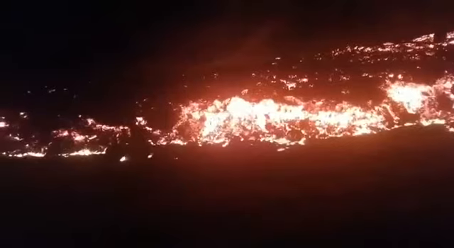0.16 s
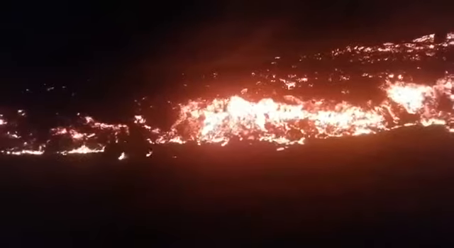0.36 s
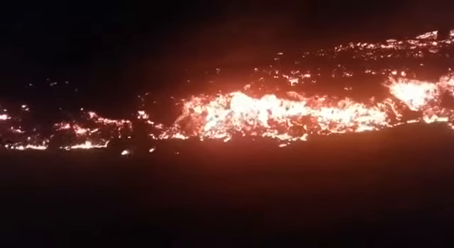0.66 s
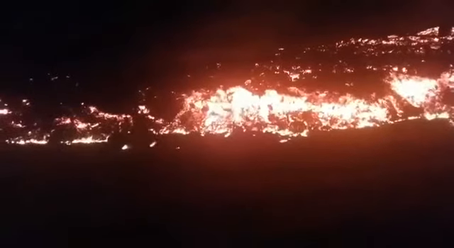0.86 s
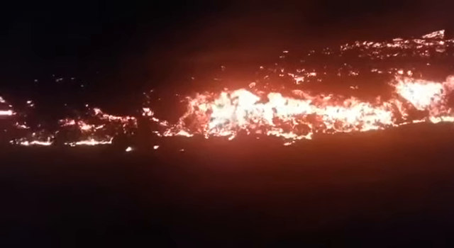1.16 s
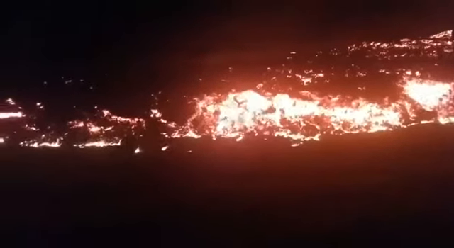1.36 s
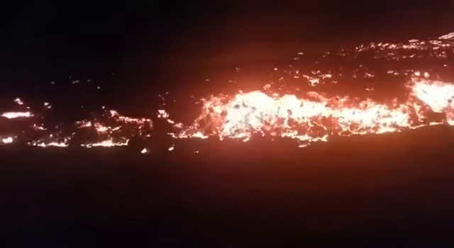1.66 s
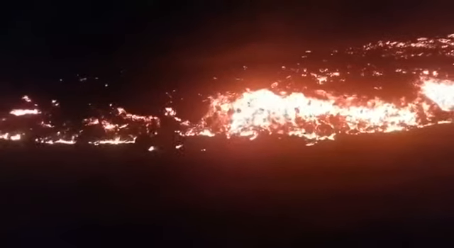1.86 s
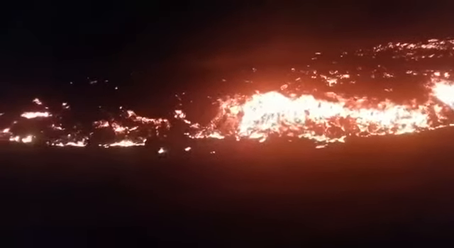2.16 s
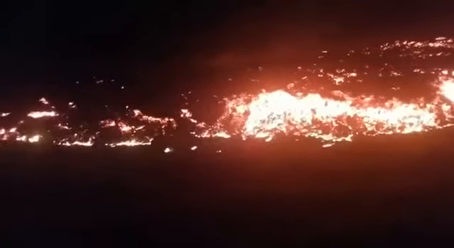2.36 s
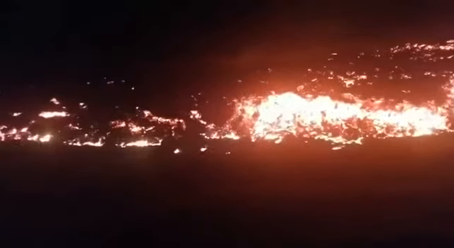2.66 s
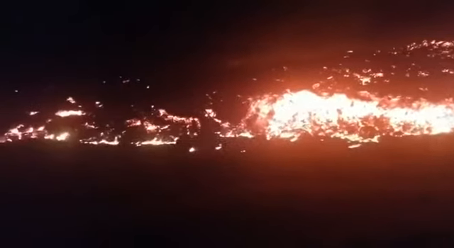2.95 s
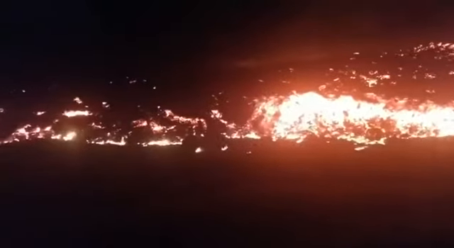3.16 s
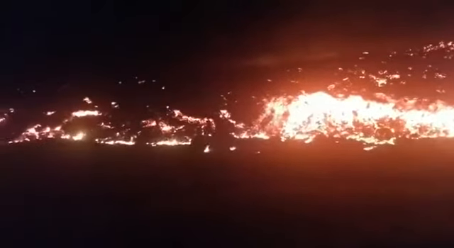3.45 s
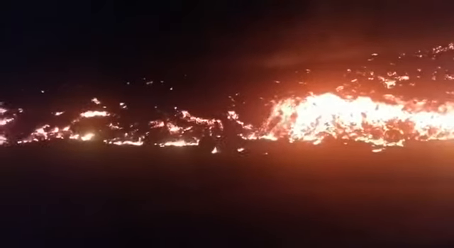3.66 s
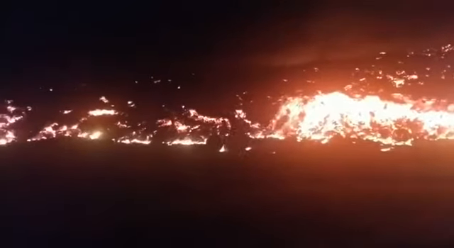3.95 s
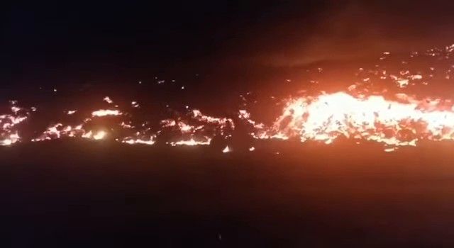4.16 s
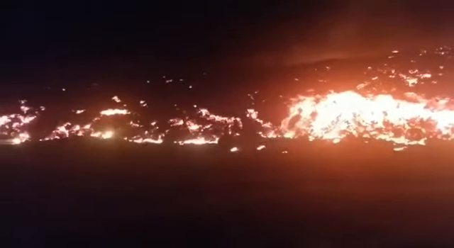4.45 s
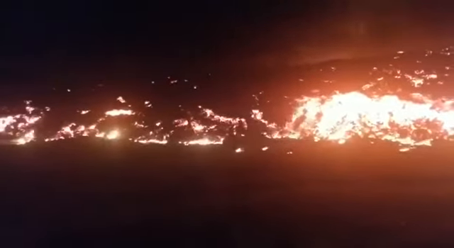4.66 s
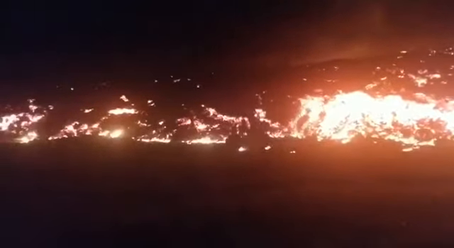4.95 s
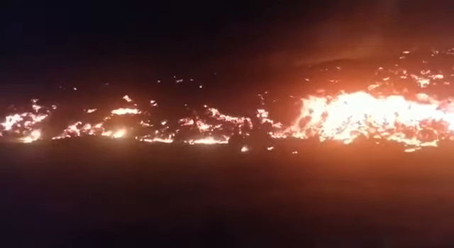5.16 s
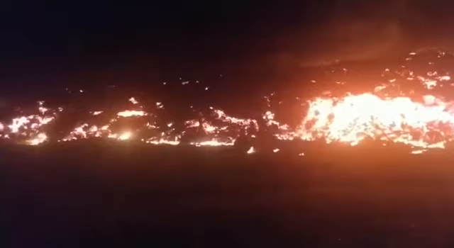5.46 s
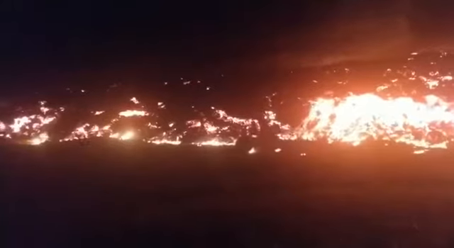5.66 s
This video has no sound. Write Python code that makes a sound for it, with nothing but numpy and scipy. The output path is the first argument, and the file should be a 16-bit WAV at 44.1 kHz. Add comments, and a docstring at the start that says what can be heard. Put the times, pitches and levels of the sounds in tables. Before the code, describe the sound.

A steady, bright hiss of gas and fine grit runs throughout, mixed with coarser, brittle crackling and wavering slightly as small slides come and go. Faint low wind lies beneath. The first 0.7 s holds mostly hiss, soft rustling and a couple of snaps. From about 0.8 s loose pieces clink, knock and click, with small dull slumps recurring until 2.8 s. Thin, breathy whistles appear faintly near 1.1, 1.4 and 1.5 s. Breakage is busiest from 1.5 to 2.7 s, with prominent glassy ticks at 1.5 s and crunchy snaps around 1.8-1.95, 2.35 and 2.65 s. It thins around 3 s; two high whistles sink near 3.6 s. A compact knock-and-clink cluster comes at 4.18 s, a strong short clink at 4.82 s, and a rattling cluster at 5.07 s. A last faint whistle passes near 5.6 s while hissing continues. Outdoor, close, mono, very short echo.

```python
"""A front of clinkery lava creeps forward at night, heard outdoors through one small microphone.
From the start, shaped noise and tiny damped sines hiss and crackle over a low noise rumble of light wind.
Soon the crust snaps in noise bursts, rustles in swelling noise and, until about halfway, slumps dully.
Loose pieces then clink as short sine rings and knock as single pushes; plates click in very short noise.
About a second in comes the first of a few thin, breathy whistles."""
import sys
import numpy as np
from scipy import signal
from scipy.fft import rfft, irfft, next_fast_len
from scipy.io import wavfile
from scipy.ndimage import uniform_filter1d, map_coordinates

SR = 44100
rng = np.random.default_rng(int(sys.argv[2]) if len(sys.argv) > 2 else 0)


def transcribe(u):
    """Save the signal u as a 16-bit wav file named by the first command-line argument.

    u: samples, shape (n,) or (channels, n), limited to [-1, 1]; the rate is SR.
    q: integer samples, one column per channel.
    """
    v = np.clip(np.atleast_2d(u).T, -1, 1)
    q = np.round(v * 32767).astype(np.int16)
    wavfile.write(sys.argv[1], SR, q)


N = 255780

# how busily the front crumbles: (time [s], activity [dB])
ACTIVITY = [(0, -0.4), (.55, 0), (.73, -2), (.78, 0), (.92, -0.5), (1.12, 0), (1.2, -2.5), (1.26, -2.8),
            (1.31, 1), (1.92, 1), (2.25, -0.4), (2.5, -0.9), (2.95, -1.5), (3.03, -0.9), (3.4, -1),
            (3.55, 0.5), (3.88, 1.36), (3.94, -1), (4.08, -1.5), (4.22, 1.1), (4.62, 1), (4.69, -0.4),
            (4.76, 0.3), (4.9, 1.5), (4.99, -0.7), (5.1, 1), (5.27, -0.7), (5.45, 0.2), (5.8, 0)]
# spectrum of gas and fine grit: (frequency [Hz], relative level [dB])
HISS_SPECTRUM = [(150, -11.5), (400, -10), (1000, -4.5), (2500, -3), (4500, -3.5), (5100, -0.5),
                 (6600, -0.5), (7400, 1.5), (8000, 0.7), (8300, -0.35), (9000, 1), (10600, -0.7),
                 (11200, -7)]
# spectrum of the crumbling crust: (frequency [Hz], relative level [dB])
CRUST_SPECTRUM = [(200, -42.5), (450, -3.5), (700, -7.5), (900, 2), (1150, -8), (1400, -7), (2000, -2.5),
                  (3000, -7.5), (4200, -2.5), (6500, -3), (11000, -8.5)]
# resonant hollows in the rubble: (centre [Hz], width [Hz], lift at unit depth [dB])
HOLLOW_MODES = [(923, 53, -2), (1342, 52, 7), (1690, 79, 4), (2070, 26, 2), (2610, 99, 2), (3024, 260, 2.5),
                (3750, 46, 4.5)]
# spectrum of wind at the microphone: (frequency [Hz], relative level [dB])
WIND_SPECTRUM = [(20, -56), (35, -43), (48, -20), (62, 0.5), (95, 0), (130, -4), (200, -12.5), (350, -23),
                 (900, -20), (3000, -39.5)]
# gusts: (middle [s], length [s], relative level [dB])
WIND_GUSTS = [(.5, 0.16, -49), (1.34, 0.067, -52), (2.95, 0.11, -42), (3.03, 0.051, -42),
              (3.4, 0.75, -51.5), (3.635, .075, -40), (3.98, .06, -47), (5.15, 0.34, -58)]
# the crust snaps and sheds grit: (time [s], relative crunch level [dB], brightness [dB], t60 [s])
CRUST_SNAPS = [(.156, -33, 12.5, .04), (.307, -25.5, 2, 0.059), (0.811, -28, 10, .034),
               (0.855, -28.5, 4.5, 0.078), (.998, -31, -4, .04), (1.018, -28.5, 0, 0.056),
               (1.162, -29.5, 7.5, 0.044), (1.284, -29, 5.5, 0.095), (1.504, -30, -6, .025),
               (1.512, -28.5, 1, .08), (1.54, -29, 3, .04), (1.586, -26.5, 2.5, 0.073),
               (1.62, -32, 9.5, 0.126), (1.738, -35, 10.5, 0.11), (1.794, -22.5, -1, .06),
               (1.805, -27, 7, .08), (1.826, -28.5, 7.5, .075), (1.908, -26.5, 1, .06),
               (1.946, -22, 1.5, 0.051), (1.979, -28, 6, .035), (2.158, -29.5, 7.5, 0.046),
               (2.302, -27.5, -2, 0.055), (2.338, -28, 5.5, 0.19), (2.366, -23, 2.5, 0.119),
               (2.64, -22, 2.5, 0.032), (2.855, -30, -4.5, 0.045), (3.009, -36, 6, .04),
               (3.298, -27, 4, 0.077), (3.727, -33, 9, 0.1), (3.862, -28, 4, 0.058), (3.895, -31, -4, .04),
               (4.205, -33.5, 14, .031), (4.335, -30, 9.5, 0.026), (4.743, -33, 14, .042),
               (4.853, -37, 8, .12), (5.065, -25.5, 0, 0.045), (5.112, -29, 6, .06),
               (5.311, -28, 4.5, 0.049), (5.449, -30, 3, 0.082), (5.698, -32, 10, 0.038)]
# a snap's body, crunch and spray: (low edge [Hz], high edge [Hz])
BODY_CRUNCH_SPRAY = [(950, 2100), (2100, 4000), (4900, 11500)]
# a patch of crust crumbles softly: (middle [s], length [s], level [dB])
CRUMBLING_PATCHES = [(.25, 0.13, -36), (.54, 0.086, -36), (.79, 0.062, -39), (1.11, 0.081, -39.5),
                     (1.33, .076, -38.5), (2.0, 0.413, -39.5), (2.41, .046, -35), (3.27, 0.85, -41),
                     (3.5, 0.051, -40.5), (4.26, 0.1, -37), (5.55, 0.35, -44.5)]
# loose rubble gives way: (middle [s], length [s], relative level [dB])
RUBBLE_SLUMPS = [(0.775, 0.0406, -38), (0.855, 0.07, -38.5), (1.339, 0.054, -39.5), (1.45, 0.177, -39.5),
                 (1.58, 0.013, -34), (2.103, 0.091, -39), (2.77, 0.156, -41.5)]
# dull spectrum of slumping rubble: (frequency [Hz], relative level [dB])
SLUMP_SPECTRUM = [(50, -22), (130, -1), (300, -3.5), (550, -3.5), (900, -4.5), (2000, -17)]
# larger glassy pieces ring, and near 4.18 s the hollows ring after a knock: (time [s], pitch [Hz], relative
# level [dB], t60 [s])
GLASSY_PIECES = [(0.779, 2560, -23.5, 0.059), (.998, 1150, -19, 0.04), (1.161, 5320, -15, 0.024),
                 (1.164, 1592, -24.5, 0.083), (1.282, 7630, -22, .033), (1.324, 1234, -19, 0.035),
                 (1.51, 3090, -6.5, .016), (1.514, 3720, -22, .025), (1.514, 2075, -20, 0.057),
                 (1.531, 2082, -21, 0.078), (1.569, 2620, -12.5, 0.025), (1.803, 3190, -24, .03),
                 (1.827, 1397, -14.5, 0.0415), (1.833, 3280, -20, .03), (1.909, 1790, -16, .03),
                 (1.933, 2450, -16, .033), (1.946, 1731, -19, .03), (1.946, 3790, -17, .03),
                 (1.98, 2850, -17, 0.031), (2.302, 1215, -18, .05), (2.305, 6840, -10, .02),
                 (2.35, 7410, -23, .06), (2.366, 3716, -15, 0.089), (2.368, 1242, -19.5, .07),
                 (2.638, 1379, -12, 0.029), (2.64, 2950, -19, .022), (2.642, 2030, -23.5, 0.084),
                 (3.008, 3270, -23, .04), (3.041, 2930, -20, 0.033), (3.145, 1410, -12.5, 0.02),
                 (3.362, 1343, -21, .04), (3.484, 1760, -22, .045), (3.658, 3550, -16.5, 0.035),
                 (4.1762, 1710, -11, 0.025), (4.18, 890, -16, 0.024), (4.176, 530, -22, 0.025),
                 (4.24, 880, -24, .05), (4.642, 7420, -17, 0.043), (4.759, 4150, -24, .055),
                 (4.8245, 2470, 0, 0.022), (4.906, 780, -25.5, .05), (5.066, 922, -10, 0.04),
                 (5.067, 1320, -13, 0.03), (5.079, 980, -11, 0.03), (5.179, 7240, -19.5, .047),
                 (5.452, 1250, -20.5, .035), (5.457, 950, -24, 0.064), (5.466, 2230, -26, 0.087),
                 (5.573, 2730, -23, 0.062), (5.697, 2674, -23, 0.092), (5.701, 5330, -17, 0.033)]
# porous lumps land with hardly any ring: (time [s], pitch [Hz], relative level [dB])
POROUS_LUMPS = [(0.7841, 750, -20), (.833, 600, -30), (0.862, 447, -27), (1.338, 560, -24.5),
                (1.473, 350, -26.5), (1.489, 1290, -18), (1.576, 323, -23.5), (1.575, 1010, -23),
                (1.829, 700, -22.5), (1.931, 786, -26.5), (1.949, 705, -24.5), (2.033, 630, -20.5),
                (2.0349, 232, -21.5), (2.304, 910, -24), (3.466, 780, -20), (3.512, 474, -29),
                (3.997, 520, -29), (4.1772, 1020, -13), (4.178, 630, -19.5), (4.1826, 850, -20),
                (4.454, 654, -25), (4.8646, 1520, -15), (5.0682, 1370, -16), (5.072, 1200, -15),
                (5.075, 1194, -21), (5.16, 935, -23.5), (5.2423, 1005, -19)]
# thin plates of crust part: (time [s], pitch [Hz], relative level [dB])
PARTING_PLATES = [(0.855, 1700, -22), (1.0002, 2800, -18), (1.0186, 2200, -20), (1.325, 1800, -22.5),
                  (1.349, 1600, -19), (1.4889, 3000, -28), (1.5125, 3300, -19), (1.5745, 2400, -20),
                  (1.588, 3000, -24), (1.7942, 3400, -11), (1.8296, 2400, -17.5), (2.3036, 2400, -25),
                  (2.3656, 3400, -23.5), (2.393, 7400, -14), (2.6418, 3600, -13.5), (3.1301, 2300, -16.5),
                  (3.1484, 1800, -16.5), (3.6629, 4500, -23), (4.3353, 6000, -13), (4.8649, 2100, -15.5),
                  (5.2429, 1800, -21), (5.7, 4500, -21)]
# gas whistles through a crack: (middle [s], length [s], pitch [Hz], fall [octaves/s], relative level [dB])
GAS_WHISTLES = [(1.06, .16, 5970, 0.74, -41), (1.38, .16, 3930, 0, -39), (1.505, .05, 3100, 0.12, -35),
                (1.535, .035, 3870, 0.098, -34), (3.555, 0.061, 6170, .5, -33.5),
                (3.628, .075, 5190, 1.5, -33), (5.64, .15, 5990, .4, -38)]

HISS_DB, CRUST_DB = -30.5, -36.5  # levels at 0 dB activity
CRUST_GROWS = 2.06  # crackle dB per dB of activity
BREEZE_DB = -51  # between gusts, relative to the gust levels
FLAKE_CYCLES = 14  # typical cycles for a flake's ring to fall to 1/e
RISE_SHARE = .04  # time constant of a snap's rise as a share of its t60
RUB_BLUR, RUB_DB = .3, 2  # wavering of a rubbing piece: phase [radians], level [dB]
TOP_HZ = 11250  # band limit of the recorder


def amp(db):
    """Turn decibels into gain."""
    return 10 ** (np.asarray(db) / 20)


def unit(x):
    """Bring a sound to rms 1."""
    return x / np.sqrt(np.mean(x ** 2) + 1e-20)


def curves(rows):
    """Draw one value per sample for each column after the time."""
    s, *cols = np.transpose(rows)
    return [np.interp(np.arange(N) / SR, s, c) for c in cols]


def wobble(rate):
    """A smooth random curve through this many knots a second."""
    knots = rng.standard_normal(int(N * rate / SR) + 4)
    return map_coordinates(knots, [np.arange(N) * rate / SR])


def filtered(x, response):
    """Shape a sound by a gain that depends on frequency."""
    m = next_fast_len(len(x) + SR // 10)
    spectrum = rfft(x, m) * response(np.fft.rfftfreq(m, 1 / SR))
    return irfft(spectrum, m)[:len(x)]


def coloured(x, spectrum):
    """Shape a sound by (frequency [Hz], level [dB]) points, at rms 1."""
    f, db = np.transpose(spectrum)
    return unit(filtered(x, lambda hz: amp(np.interp(np.log(hz + 1), np.log(f), db))))


def band(x, low_hz, high_hz, order=4):
    """Causal band-pass."""
    edges = [low_hz, min(high_hz, SR / 2 - 1)]
    return signal.sosfilt(signal.butter(order, edges, "band", fs=SR, output="sos"), x)


def add(track, s, sound):
    """Mix a sound into the track at time s."""
    part = track[max(round(s * SR), 0):][:len(sound)]
    part += sound[:len(part)]


def swells(rows):
    """Summed gain of bell-shaped swells; each length spans the points at 1/e of the peak."""
    t = np.arange(N) / SR
    return sum(amp(db) * np.exp(-(2 * (t - s) / length) ** 2) for s, length, db in rows)


def patchy(depth_db, size=512):
    """Noise whose bands swell and fade independently."""
    z = signal.stft(rng.standard_normal(N), nperseg=size)[2]
    across_bands = uniform_filter1d(rng.standard_normal(z.shape), size=5, axis=0)
    field = uniform_filter1d(across_bands, size=7, axis=1)
    return unit(signal.istft(z * amp(depth_db * unit(field)), nperseg=size)[1][:N])


def grains(count, low_hz, high_hz, cycles, spread_db, size=700):
    """Tiny fractures at random times: damped sines, many faint and a few strong."""
    when, pitch, life, strength = rng.random((count, 4)).T[:, :, None]
    hz = low_hz + (high_hz - low_hz) * pitch
    t = np.arange(size) / SR
    gain = amp(-spread_db * np.log(np.maximum(strength, .02)))
    decay = np.exp(-t * hz / (cycles * (.5 + life)))
    waves = gain * np.sin(2 * np.pi * hz * t) * decay
    places = (when * N).astype(int) + np.arange(size)
    return unit(np.bincount(places.ravel(), waves.ravel(), N)[:N])


def hollow(x, depth=1):
    """Hollows in the rubble resonate, colouring narrow bands of the sound."""
    def response(hz):
        return amp(depth * sum(db / (1 + (2 * (hz - centre) / width) ** 2)
                               for centre, width, db in HOLLOW_MODES))
    return filtered(x, response)


def front(hiss_grain=0.17, crust_grain=0.5, chink=0.39, tick=0.13, hiss_slide_db=0.69, crust_slide_db=1.2):
    """Gas and fine grit hiss over the coarser crackle of crumbling crust; small slides sway both."""
    activity_db, = curves(ACTIVITY)
    slides = wobble(48)
    grit = grains(count=3500, low_hz=2970, high_hz=11050, cycles=5.96, spread_db=3.5, size=300)
    # hairline cracks close by give single dry ticks
    ticks = grains(count=400, low_hz=1470, high_hz=5520, cycles=0.6, spread_db=2.0, size=200)
    fizz = patchy(depth_db=2.5) + hiss_grain * grit + tick * ticks

    crumbs = grains(count=1800, low_hz=1200, high_hz=6000, cycles=1.5, spread_db=2.5)
    # small glassy flakes ring briefly as they trickle down
    flakes = grains(count=900, low_hz=1106, high_hz=4232, cycles=FLAKE_CYCLES, spread_db=2.5, size=900)
    crackle = patchy(depth_db=3.0, size=1024) + crust_grain * crumbs + chink * flakes

    hiss_gain = amp(HISS_DB + activity_db + hiss_slide_db * slides)
    crust_gain = amp(CRUST_DB + CRUST_GROWS * activity_db + crust_slide_db * slides)
    return hiss_gain * coloured(fizz, HISS_SPECTRUM) + crust_gain * coloured(hollow(crackle), CRUST_SPECTRUM)


def wind(level_db=0.6, flutter_db=1.0):
    """Soft low buffeting: a fluttering breeze with a few gusts."""
    strength = amp(BREEZE_DB + flutter_db * wobble(12.0)) + swells(WIND_GUSTS)
    return amp(level_db) * strength * coloured(rng.standard_normal(N), WIND_SPECTRUM)


def snaps(lead_s=.012, rough=0.29, ragged_db=-0.5, trickle=0.13, trickle_t60=0.43, level_db=-4.0):
    """A quick run of micro-fractures sounds in the hollows and dies away in falling grit."""
    out, t = np.zeros(N), np.arange(SR // 5) / SR - lead_s
    age = np.maximum(t, 0)
    for s, crunch_db, bright_db, t60 in CRUST_SNAPS:
        rough_noise = rng.standard_normal(len(t)) * np.exp(rough * wobble(2497)[:len(t)])
        fractures = hollow(rough_noise, depth=1.6)
        rise = 1 / (1 + np.exp(-t / (RISE_SHARE * t60)))
        fall = amp(-60 * age / t60) + trickle * amp(-60 * age / trickle_t60)
        envelope = rise * fall * amp(level_db + ragged_db * wobble(180)[:len(t)])
        # a bright snap has more spray and less body
        levels_db = crunch_db - bright_db, crunch_db, crunch_db + bright_db
        burst = sum(amp(db) * unit(band(fractures, *edges)) for db, edges in zip(levels_db, BODY_CRUNCH_SPRAY))
        add(out, s - lead_s, envelope * burst)
    return out


def scatter(x, t60=0.077):
    """The rubble slope throws back a short diffuse echo."""
    t = np.arange(SR // 4) / SR
    tail = rng.standard_normal(len(t)) * amp(-60 * t / t60) * (1 - np.exp(-t / 0.015))
    return signal.fftconvolve(x, tail / np.linalg.norm(tail))[:N]


def rustles(rough=0.13, low_hz=1150, high_hz=2500):
    """Coarse crumbs rub and roll over the hollows."""
    crumbs = rng.standard_normal(N) * np.exp(rough * wobble(400))
    return swells(CRUMBLING_PATCHES) * unit(hollow(band(crumbs, low_hz, high_hz, order=2)))


def slumps(rough=0.44, level_db=1):
    """Many soft contacts swell and fade as a patch of rubble gives way."""
    contacts = rng.standard_normal(N) * np.exp(rough * wobble(300))
    return amp(level_db) * swells(RUBBLE_SLUMPS) * coloured(contacts, SLUMP_SPECTRUM)


def chips(count=40, low_hz=3000, high_hz=8200, middle_db=-23.5, spread_db=2, t60=0.03):
    """Small pieces drop at random: rows like those of the larger ones."""
    return [(when * N / SR, low_hz * (high_hz / low_hz) ** pitch, middle_db + spread_db * (2 * strength - 1), t60)
            for when, pitch, strength in rng.random((count, 3))]


def clinks(rise_s=0.0038, level_db=-1.0):
    """A piece rings in one main mode; rubbing on its neighbours blurs the pitch and makes it chatter."""
    out, t = np.zeros(N), np.arange(SR // 8) / SR
    for s, hz, db, t60 in GLASSY_PIECES + chips():
        phase = 2 * np.pi * hz * t + RUB_BLUR * wobble(430)[:len(t)]
        chatter_db = RUB_DB * wobble(364)[:len(t)]
        envelope = amp(db + level_db + chatter_db - 60 * t / t60) * (1 - np.exp(-t / rise_s))
        add(out, s, envelope * np.sin(phase))
    return out


def knocks(cycles=0.57, settle=0.13, settle_t60=0.089, level_db=-1):
    """A lump gives one short push, then a brief rattle as it settles."""
    out, t = np.zeros(N), np.arange(SR // 8) / SR
    for s, hz, db in POROUS_LUMPS:
        age = hz * t - 2  # cycles since the height of the contact
        push = np.sin(2 * np.pi * age) * np.exp(-(age / cycles) ** 2)
        grit = rng.standard_normal(len(t)) * (age > -1)
        rattle = unit(band(grit, 0.776 * hz, 1.19 * hz)) * amp(-60 * t / settle_t60)
        add(out, s - 1.5 / hz, amp(db + level_db) * (push + settle * rattle))
    return out


def cracks(t60=0.0101, octaves=0.91, level_db=-5):
    """A plate parts at once: a dry click of band noise, with no shaped rise and a very short decay."""
    out, t = np.zeros(N), np.arange(SR // 30) / SR
    for s, hz, db in PARTING_PLATES:
        noise = rng.standard_normal(len(t))
        splinters = unit(band(noise, hz / 2 ** octaves, hz * 2 ** octaves, order=2))
        add(out, s, amp(db + level_db - 60 * t / t60) * splinters)
    return out


def whistles(breath=0.88, flutter_db=3):
    """Gas in a widening crack gives a breathy, fluttering tone that in most cases sinks."""
    out, t = np.zeros(N), np.arange(N) / SR
    for s, length, hz, fall, db in GAS_WHISTLES:
        pitch = hz * 2 ** (-fall * np.clip(t - s, -length, length))
        phase = 2 * np.pi * np.cumsum(pitch) / SR + breath * wobble(500)
        out += swells([(s, length, db)]) * amp(flutter_db * wobble(90)) * np.sin(phase)
    return out


def scene(echo_db=-11):
    """Everything reaches one microphone, so both channels are alike."""
    breaking = snaps() + clinks() + knocks() + cracks()
    echo = amp(echo_db) * scatter(breaking)
    mono = front() + wind() + breaking + echo + rustles() + slumps() + whistles()
    return np.array([mono, mono])


def record(dry):
    """The recorder cuts off steeply at its band limit."""
    def low_pass(hz):
        return 1 / np.sqrt(1 + (hz / TOP_HZ) ** 200)
    return np.array([filtered(channel, low_pass) for channel in dry])


dry = scene()
out = record(dry)
transcribe(out)
```